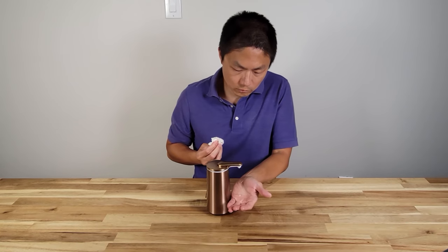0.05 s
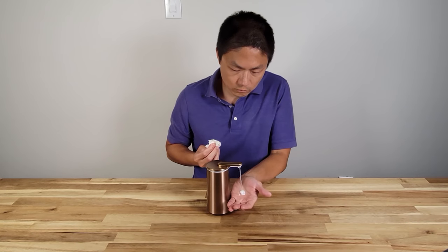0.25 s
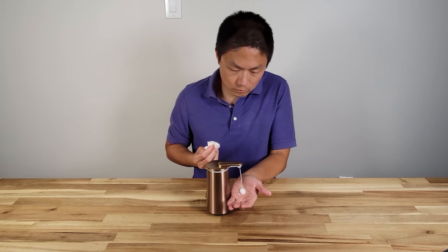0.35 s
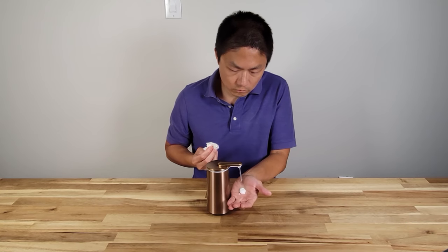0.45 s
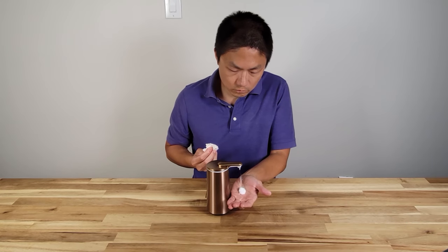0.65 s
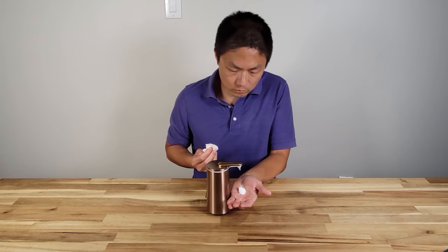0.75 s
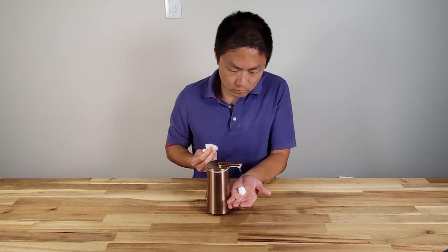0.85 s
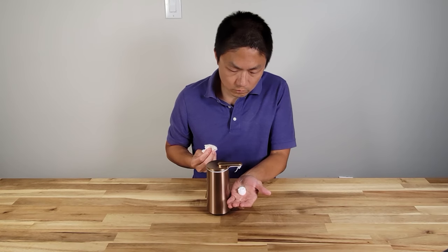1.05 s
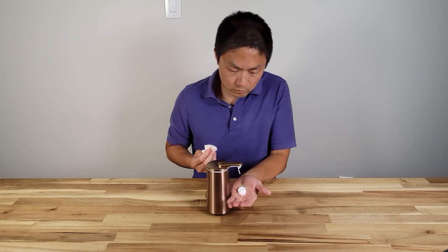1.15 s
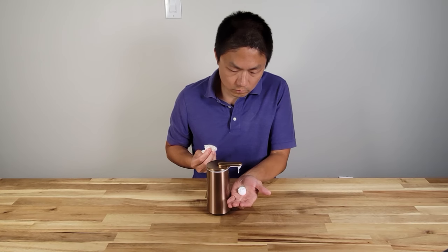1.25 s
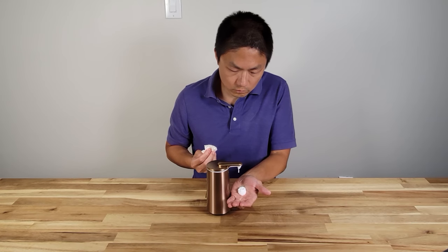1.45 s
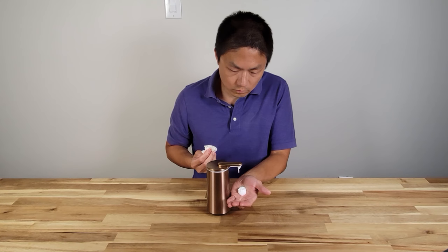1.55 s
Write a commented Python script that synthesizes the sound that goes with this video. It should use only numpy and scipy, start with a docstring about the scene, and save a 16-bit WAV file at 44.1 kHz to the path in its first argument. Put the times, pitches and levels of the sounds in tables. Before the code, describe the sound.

An automatic soap dispenser whirs for under a second, its plastic gears ticking and rattling. The motor buzzes harder near the end, then the pump knocks and stops. It is heard nearby in a quiet room with a faint hum.

```python
"""In a quiet room, on a wooden table, an automatic soap dispenser runs for 0.8 s.
Its plastic gear teeth tick and rattle inside the casing over a rough, throbbing whirr.
Near the end the pump starts to push: the hard-working motor buzzes once a turn,
then the pump knocks and stops. The room rings out over a low mains hum."""
import sys
import numpy as np
from scipy import signal
from scipy.fft import rfft, irfft
from scipy.io import wavfile

SR = 44100
rng = np.random.default_rng(int(sys.argv[2]) if len(sys.argv) > 2 else 0)


def put_to_file(sound):
    """Save the sound as 16-bit audio at rate SR, in the file named by the first command-line argument."""
    columns = np.atleast_2d(sound).T  # one column per channel
    safe = np.clip(columns, -1, 1)
    whole_steps = np.round(safe * 32767)
    wavfile.write(sys.argv[1], SR, whole_steps.astype(np.int16))


N = 70560
START_S, LOAD_S, STOP_S = 0.1995, 0.8216, 0.98  # motor starts, pump pushes, motor stops
SPIN_UP_S, LOAD_RAMP_S, RUN_DOWN_S = 0.01, 0.013, 0.026
GEAR_TEETH = 9

# Levels in the tables are relative: a higher level_db is louder.
# How fast the motor turns: time_s, turns_per_s
MOTOR_SPEED = [(.2, 97), (.28, 101.5), (.36, 103), (.45, 104.8), (.6, 104.3), (.72, 105), (.8, 100),
               (.865, 105), (.96, 104.5), (1., 102.5)]
# How loudly the teeth chatter: time_s, level_db
CHATTER_LEVEL = [(.2, -32.5), (.24, -30.5), (.37, -32.5), (.43, -32.5), (.64, -33.5), (.79, -32.5),
                 (.85, -33), (.96, -29.5), (1., -30.5)]
# Gears clattering in the gaps between their teeth: peak_s, level_db
RATTLES = [(0.25, -1), (0.266, -5.5), (0.299, -4.5), (0.335, -2), (0.36, 1), (0.368, 0.5), (0.399, -0.5),
           (0.419, -7), (.431, 0.5), (0.45, -1), (0.461, -1), (0.478, 0), (.492, -1.5), (0.501, 0.5),
           (0.525, -2.5), (0.553, 0.5), (.575, -2), (.587, -1.5), (0.613, 1), (.629, -6), (0.65, -1),
           (.658, -4.5), (0.683, 3), (.707, -11.5), (.721, 1), (.752, 2.5), (.782, -1.5), (.805, -1.5),
           (0.815, 4.5), (0.849, -1), (0.862, 1), (0.875, -8), (0.897, -4.5), (.915, -4), (0.932, -7),
           (.946, -0.5), (0.954, -9)]
# The tone colour of the casing: pitch_hz, level_db
CASING_COLOUR = [(100, -6), (300, -2), (600, 1.5), (760, -15), (1150, -13.5), (1500, -4.5), (2000, -2),
                 (2300, -17), (3200, -2.5), (3900, -16), (4500, -6), (5250, -17.5), (6500, -8),
                 (6950, -11.5), (7300, 0.5), (8400, -7.5), (9500, -5.5), (10200, -9), (11500, -11.5),
                 (12500, -9.5), (13100, -13.5), (15500, -16)]
# Pitches at which the casing rings: pitch_hz, width_hz, boost_db
CASING_PEAKS = [(2693, 173, 10.5), (4933, 247, 13), (5550, 320, 10.5), (7940, 580, 4), (8900, 360, 6),
                (9370, 280, 7), (10760, 160, 8.5)]
# The extra colour while the pump strains: pitch_hz, level_db
STRAIN_COLOUR = [(300, -17.5), (800, -12), (1250, 5.5), (2100, -2), (2750, 5), (3700, -17), (12000, -6.5)]
# Tones of the gears running freely: cycles_per_turn, level_db, roughness (0 is smooth)
WHIRR_TONES = [(1.2, -56, 1), (1.53, -50, 1), (3.19, -50.5, .6), (3.75, -47, .45), (4.375, -41, .4),
               (5, -44, .8), (5.25, -44, .9), (5.625, -42, .8), (5.875, -38.5, .65)]
# How the whirr swells and sinks: time_s, level_db
WHIRR_LEVEL = [(.2, -19), (.245, -10), (.28, -1.5), (.38, 0), (.5, -2.5), (.6, -2.5), (.715, 3), (.765, -4),
               (.86, -7)]
# Tones of the hard-working motor: cycles_per_turn, level_db
BUZZ_TONES = [(1, -43), (3, -44.5), (4, -33.5), (5, -37.5), (6, -36.5), (10, -52)]
# Knocks of the pump: start_s, level_db
KNOCKS = [(.9345, 0), (.9615, -8), (.969, -7), (.9735, -1), (.9915, -15)]
# Notes of the struck pump body: pitch_hz, level_db, ring_s (time to fade by 60 dB)
PUMP_NOTES = [(1090, -11, .02), (1230, -7, .025), (1340, 0, .06), (1470, -9, .022), (1700, -12, .015)]
# Notes of the jolted motor mount: pitch_hz, level_db, ring_s
MOUNT_NOTES = [(126.5, -38.5, 0.33), (430, -40, 0.044), (484, -28.5, 0.042)]
# The colour the casing sends out all around into the room: pitch_hz, level_db
SPREAD_COLOUR = [(100, -10), (600, 1), (800, -9.5), (2200, -2), (2580, 1.5), (3700, -10.5), (4900, -7.5),
                 (6200, -8), (8000, -3.5), (15500, -10.5)]
# Low notes that hang in the room: start_s, fade_start_s, pitch_hz, level_db
LINGERING_NOTES = [(.97, 1.07, 416, -40), (.98, 1.15, 622, -54), (1.09, 1.45, 335, -57.5)]
# The colour of the still room air: pitch_hz, level_db
AIR_COLOUR = [(20, -52), (33, -27), (43, -8), (60, -11.5), (95, -22), (130, -5), (190, -15.5), (260, -14),
              (400, -21.5), (640, -26.5), (1000, -25), (1450, -28.5), (2150, -46.5), (2580, -36),
              (3000, -42), (5000, -41), (7700, -48.5), (12000, -51), (15500, -47.5)]


def gears(turns, load, scatter_db=2, slop_teeth=0.44, scrape=1.33, rub_teeth=0.4):
    """Loose teeth click early or late and scrape, throbbing once a turn, more deeply under load."""
    teeth = turns * GEAR_TEETH
    slip = slop_teeth * np.interp(teeth, np.arange(N), rng.standard_normal(N))
    teeth = np.maximum.accumulate(np.maximum(teeth + slip, 0))  # gears never run backwards
    tooth = teeth.astype(int)
    strength = undb(scatter_db * np.clip(rng.standard_normal(N), -2, 2))[tooth]
    clicks = smear(unit(np.diff(tooth, prepend=0) * strength), decay_s=0.0008)
    rub = unit(rng.standard_normal(N) * strength * np.exp(-(teeth % 1) / rub_teeth))
    throb = 1 + (0.03 + 0.037 * load) * np.cos(2 * np.pi * turns)
    return unit(clicks + scrape * rub) * throb * undb(curve(CHATTER_LEVEL)) * running()


def rattle(level_db=-25.5, rise_s=0.0029, fall_s=0.0037):
    """The gears clatter in the gaps between their teeth, making short bursts of noise."""
    t = np.arange(N) / SR
    bursts = sum(undb(db) * np.exp(-np.maximum((t - peak_s) / fall_s, (peak_s - t) / rise_s) ** 2)
                 for peak_s, db in RATTLES)
    return undb(level_db) * bursts * rng.standard_normal(N)


def casing(force, load, strain_db=-4):
    """The teeth make the casing ring, with stronger middle pitches when the pump strains."""
    strain = colour(force * load, STRAIN_COLOUR)
    return colour(force, CASING_COLOUR, CASING_PEAKS) + undb(strain_db) * strain


def smear(clicks, decay_s):
    """Tiny echoes inside the casing spread each click out in time."""
    echoes = rfft(rng.standard_normal(N) * np.exp(-np.arange(N) / SR / decay_s))
    return irfft(rfft(clicks) * echoes / np.abs(echoes) ** .7, N)  # dividing evens out the colour


def whirr(turns):
    """The spinning gears make rough, low tones that follow the motor's speed."""
    tones = 0
    for cycles, db, roughness in WHIRR_TONES:
        tone = np.exp(2j * np.pi * cycles * turns) * (1 + roughness * flutter(rate_hz=20.5))
        tones += undb(db) * tone.real / np.hypot(1, roughness)
    return tones * undb(curve(WHIRR_LEVEL))


def motor_buzz(turns, load):
    """While the pump pushes, the motor buzzes once a turn."""
    tones = 0
    for cycles, db in BUZZ_TONES:
        tone = np.exp(2j * np.pi * cycles * turns) * (1 + 0.13 * flutter(rate_hz=31))
        random_phase = np.exp(2j * np.pi * rng.random())
        tones += undb(db) * (tone * random_phase).real
    return load * tones


def tooth_whine(turns, load, free_db=-56.5, loaded_db=-46.5):
    """The meeting teeth whine: faint and rough at first, louder and clean under load."""
    free = undb(free_db) * (1 - load) * (1 + flutter(rate_hz=25)) / np.sqrt(2)
    return (np.exp(2j * np.pi * GEAR_TEETH * turns) * (free + undb(loaded_db) * load)).real


def pump_knocks(level_db=-21):
    """The pump body is struck several times as its stroke ends."""
    return undb(level_db) * sum(undb(db) * strike(start_s, PUMP_NOTES) for start_s, db in KNOCKS)


def mount_jolt(start_s=.204):
    """The starting motor jolts its mount, which rings with low notes."""
    return strike(start_s, MOUNT_NOTES)


def fizz(level_db=-28, rise_s=0.034, decay_s=0.18):
    """A bright hiss comes as the gears get going, and soon fades."""
    age = np.maximum(np.arange(N) / SR - START_S, 0)
    hiss = colour(rng.standard_normal(N), CASING_COLOUR, CASING_PEAKS)
    hiss = signal.sosfilt(signal.butter(2, 5000, "high", fs=SR, output="sos"), hiss)
    return undb(level_db) * hiss * ramp(START_S, rise_s) * np.exp(-age / decay_s) * running()


def rumble(peak_s=.36, width_s=.06, pitch_hz=56, level_db=-48):
    """A soft, deep rumble swells briefly while the soap falls."""
    t = np.arange(N) / SR - peak_s
    return np.sqrt(2) * undb(level_db) * np.exp(-(t / width_s) ** 2) * np.sin(2 * np.pi * pitch_hz * t)


def room(sound, gap_s=0.0047, bass_ring_s=0.91, treble_ring_s=0.43):
    """Echoes from the walls blur into a tail whose high pitches die first."""
    t = np.arange(N) / SR
    hz = np.fft.rfftfreq(N, 1 / SR)
    noise, tail = rfft(rng.standard_normal(N)), 0
    edges_hz = [0, 1000, 2000, 4000, 7000, 11000, SR]
    ring_times = np.linspace(bass_ring_s, treble_ring_s, len(edges_hz) - 1)
    for low, high, ring_s in zip(edges_hz, edges_hz[1:], ring_times):
        band = irfft(noise * (hz >= low) * (hz < high), N)
        tail += band * np.exp(-np.log(1000) * t / ring_s)
    return signal.fftconvolve(sound, unit(tail * (t > gap_s)) / np.sqrt(N))[:N]


def lingering_notes(fade_s=.05):
    """Wavering low notes hang in the room as the motor stops, then fade."""
    notes = 0
    for start_s, fade_start_s, hz, db in LINGERING_NOTES:
        tone = wavering_tone(hz, depth=.3, rate_hz=12)
        notes += undb(db) * tone * ramp(start_s, fade_s) * (1 - ramp(fade_start_s, fade_s))
    return notes


def background(air_db=-51.5, hum_hz=119.7, hum_db=-53.5):
    """The room air rushes faintly under the hum of mains electricity."""
    air = colour(rng.standard_normal(N), AIR_COLOUR)
    return undb(air_db) * air + undb(hum_db) * wavering_tone(hum_hz, depth=.35, rate_hz=25)


def undb(db):
    """Turn decibels into a number to multiply by."""
    return 10 ** (np.asarray(db) / 20)


def unit(x):
    """Scale a signal so its average power is 1."""
    return x / np.sqrt(np.mean(np.abs(x) ** 2))


def curve(points):
    """Join (time_s, value) points with straight lines."""
    return np.interp(np.arange(N) / SR, *np.array(points).T)


def ramp(start_s, length_s):
    """Rise steadily from 0 to 1, then stay there."""
    return np.clip((np.arange(N) / SR - start_s) / length_s, 0, 1)


def running():
    """1 while the motor runs, 0 while it rests, with quick fades between."""
    return ramp(START_S, SPIN_UP_S) * (1 - ramp(STOP_S, RUN_DOWN_S))


def flutter(rate_hz):
    """A slow random wobble, in complex numbers so it can shake both level and pitch."""
    hz = np.fft.fftfreq(N, 1 / SR)
    return unit(np.fft.ifft(np.fft.fft(rng.standard_normal(N)) / (1 + (hz / rate_hz) ** 4)))


def wavering_tone(pitch_hz, depth, rate_hz):
    """One note that wobbles at random."""
    steady = np.exp(2j * np.pi * pitch_hz * np.arange(N) / SR)
    return unit((steady * (1 + depth * flutter(rate_hz))).real)


def strike(start_s, notes, contact_s=0.00035):
    """A cushioned blow sets off notes that each die away."""
    age = np.maximum(np.arange(N) / SR - start_s, 0)
    ring = sum(undb(db) * np.exp(-np.log(1000) * age / ring_s) * np.sin(2 * np.pi * hz * age)
               for hz, db, ring_s in notes)
    return ring * (1 - np.exp(-age / contact_s))


def colour(sound, points, peaks=()):
    """Make some pitches louder and others softer, following a colour table and any ringing peaks."""
    hz = np.maximum(np.fft.rfftfreq(N, 1 / SR), 1)
    point_hz, point_db = np.array(points).T
    db = np.interp(np.log(hz), np.log(point_hz), point_db)
    db += sum(boost / (1 + (2 * (hz - pitch) / width) ** 2) for pitch, width, boost in peaks)
    # Fold the filter in time so it rings after each click, never before.
    folded = irfft(np.log(unit(undb(db))), N)
    folded[1:N // 2] *= 2
    folded[N // 2 + 1:] = 0
    return irfft(rfft(sound) * np.exp(rfft(folded)), N)


def scene(gears_db=-1, tones_db=-1, gears_room_db=-7.5, tones_room_db=-12, blows_room_db=-20):
    """The dispenser, heard directly and through the room's echoes."""
    turns = np.cumsum(curve(MOTOR_SPEED) * (1 + .003 * flutter(rate_hz=40).real)) / SR
    load = ramp(LOAD_S - LOAD_RAMP_S / 2, LOAD_RAMP_S)  # 0 running freely, 1 pushing
    force = undb(gears_db) * (gears(turns, load) + rattle())
    clatter = casing(force, load) + fizz()
    blows = pump_knocks() + mount_jolt()
    tones = whirr(turns) + motor_buzz(turns, load) + tooth_whine(turns, load)
    tones *= np.sqrt(2) * undb(tones_db) * running()
    spread = undb(gears_room_db) * colour(force, SPREAD_COLOUR)
    echoes = room(spread + undb(tones_room_db) * tones + undb(blows_room_db) * blows)
    return (clatter + blows + tones + echoes + lingering_notes() + rumble() + background())[None]


def record(dry, bottom_hz=36, top_hz=15800):
    """Cut away the deepest bass and the highest treble."""
    dry = signal.sosfilt(signal.butter(6, bottom_hz, "high", fs=SR, output="sos"), dry)
    return signal.sosfilt(signal.ellip(10, .2, 80, top_hz, fs=SR, output="sos"), dry)


dry = scene()
out = record(dry)
put_to_file(out)
```